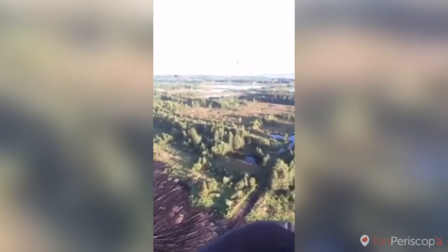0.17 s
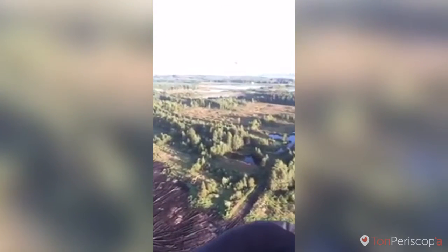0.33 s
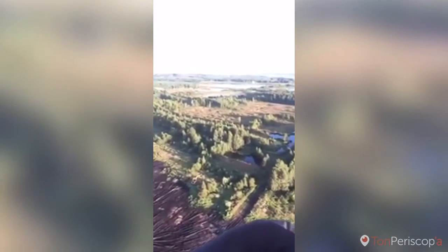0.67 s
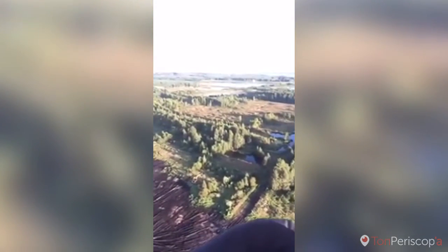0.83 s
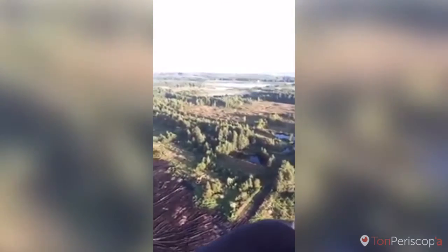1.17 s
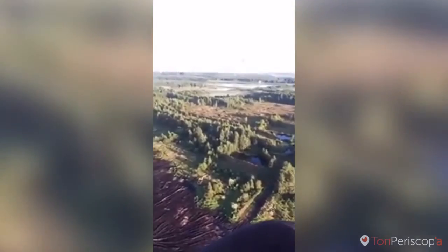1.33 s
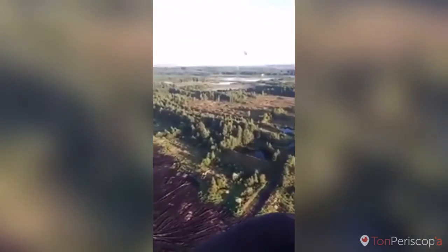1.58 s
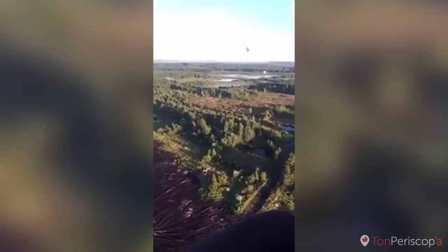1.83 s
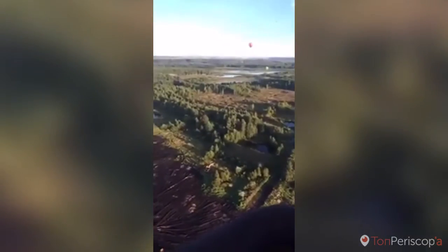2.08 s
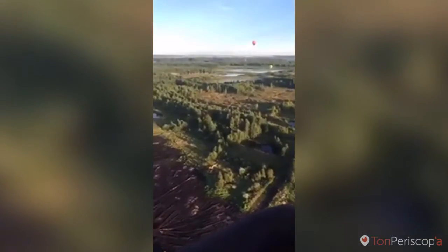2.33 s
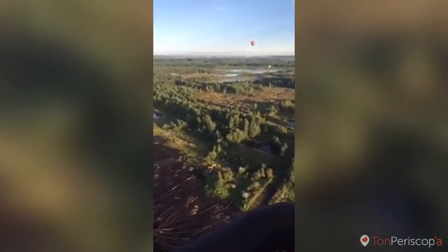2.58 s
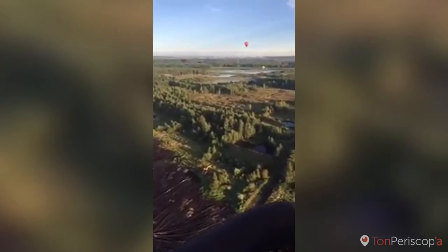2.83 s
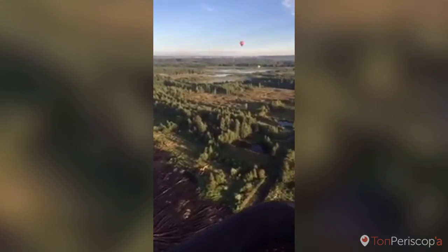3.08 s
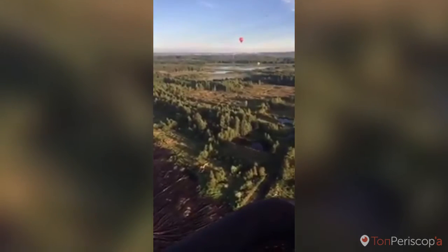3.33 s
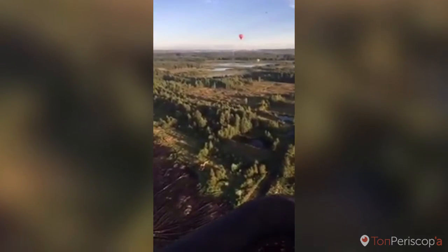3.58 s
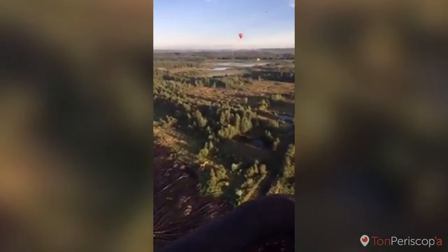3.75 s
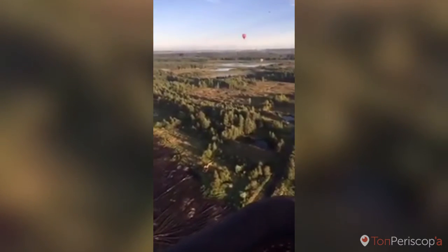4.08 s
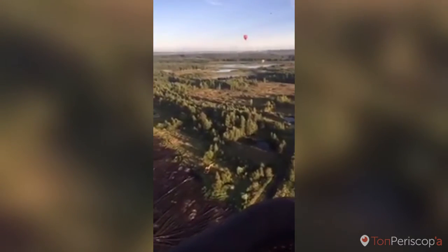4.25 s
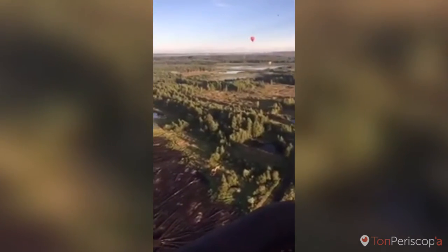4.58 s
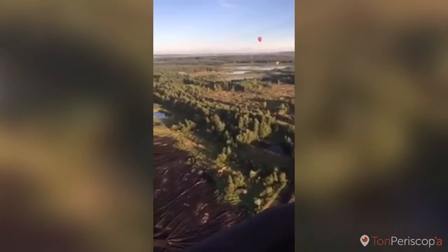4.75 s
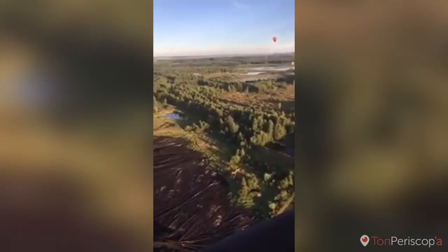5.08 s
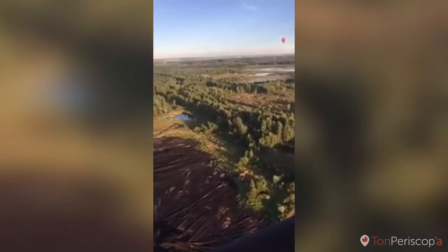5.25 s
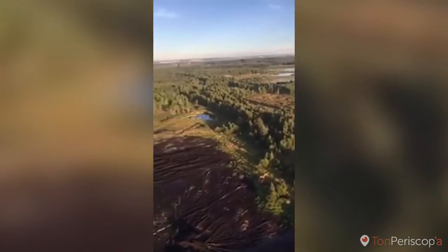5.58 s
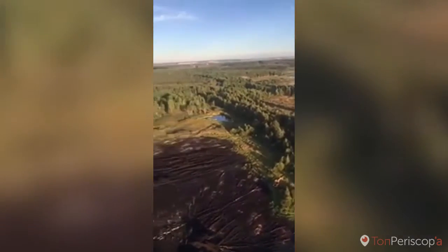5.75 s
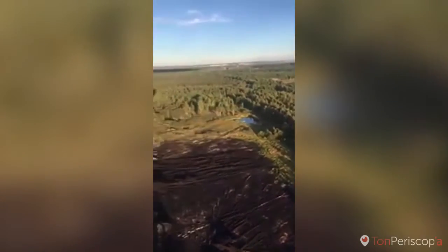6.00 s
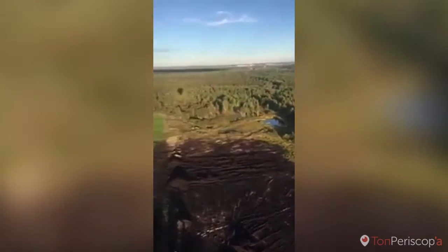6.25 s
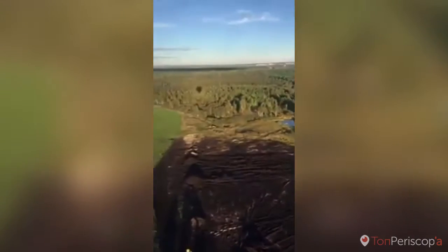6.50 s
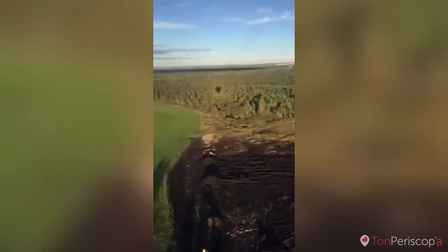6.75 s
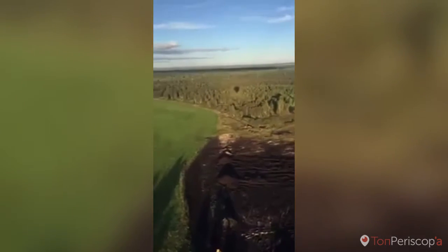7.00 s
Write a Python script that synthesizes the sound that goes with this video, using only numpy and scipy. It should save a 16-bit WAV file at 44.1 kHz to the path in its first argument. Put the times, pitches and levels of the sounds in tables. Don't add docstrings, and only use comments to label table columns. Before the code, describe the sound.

High in open air, a small pilot flame sputters and ticks quietly until a balloon burner bursts into a loud hissing roar, eases, and roars again.

```python
import sys
import numpy as np
from scipy import signal
from scipy.fft import rfft, irfft, next_fast_len
from scipy.io import wavfile
from scipy.ndimage import uniform_filter1d

SR = 44100
rng = np.random.default_rng(int(sys.argv[2]) if len(sys.argv) > 2 else 0)


def dump(signal):
    limited = np.clip(np.atleast_2d(signal).T, -1, 1)
    pcm = np.round(limited * 32767).astype(np.int16)
    wavfile.write(sys.argv[1], SR, pcm)


def boost_factor(decibels):
    exponent = np.asarray(decibels, float) / 20
    return 10 ** exponent


N = 314854


def rms_one(x):
    return x / np.sqrt(np.mean(x ** 2) + 1e-20)


def in_time(rows):
    s, *columns = np.transpose(rows)
    return [np.interp(np.arange(N) / SR, s, column) for column in columns]


def bump(s, width):
    return np.exp(-((np.arange(N) / SR - s) / width) ** 2)


def delayed(x, lag_s):
    return np.interp(np.arange(N) - lag_s * SR, np.arange(N), x)


def filtered(x, order, hz, kind="low"):
    return signal.sosfilt(signal.butter(order, hz, kind, fs=SR, output="sos"), x)


def stretch(coarse):
    return np.interp(np.arange(N) / 40, np.arange(len(coarse)), coarse)


def drift(rate):
    r = np.exp(-80 * np.pi * rate / SR)
    white = rng.standard_normal(N // 40 + 2002)
    return rms_one(signal.lfilter([1], [1, -2 * r, r * r], white)[2000:])


def turbulence(spectrum, patchy_db, rate):
    size = next_fast_len(N)
    hz = np.arange(size // 2 + 1) * SR / size + 1e-3
    points = np.array(spectrum)
    colour = boost_factor(np.interp(np.log(hz), np.log(points[:, 0]), points[:, 1], left=-120, right=-120))
    coloured = colour * rfft(rng.standard_normal(size))
    place = np.log2(hz / points[1, 0]) * 3 / 2
    count = int(np.log2(points[-2, 0] / points[1, 0]) * 3 / 2) + 1
    out, together = 0, drift(rate)
    for k in range(count + 1):
        share = np.clip(1 - abs(np.clip(place, 0, count) - k), 0, 1)
        swelling = stretch(boost_factor(patchy_db * (0.49 * together + drift(2 * rate))))
        out = out + swelling * irfft(share * coloured, size)[:N]
    return rms_one(out)


def resonance(x, hz, width):
    r = np.exp(-np.pi * width / SR)
    top = np.array([1, 0, -1]) * (1 - r * r) / 2
    return signal.lfilter(top, [1, -2 * r * np.cos(2 * np.pi * hz / SR), r * r], x)


def ring(clicks, hz, t60):
    r, w = boost_factor(-60 / (t60 * SR)), 2 * np.pi * hz / SR
    return signal.lfilter([0, np.sin(w)], [1, -2 * r * np.cos(w), r * r], clicks + 1e-18)


# (time [s], level [dB])
PILOT_SIZE = [(0.0, -51), (0.32, -49.5), (0.71, -56), (1.04, -53.5), (1.75, -58), (2.64, -53), (3.02, -52),
              (3.28, -55), (4.41, -56.5), (4.6, -55.5), (5.16, -56), (5.42, -54.5)]
# (frequency [Hz], density [dB per Hz])
FLUTTER_COLOUR = [(15, -60), (25, -23), (40, -37), (54, 2), (97, -3), (140, -7), (180, -52), (310, -120)]
RUMBLE_COLOUR = [(71, -30), (120, 0.5), (156, -3.5), (216, -3.5), (275, -11), (302, -17), (343, -14),
                 (410, -27.5), (550, -57), (720, -21.5), (1210, -120)]
PILOT_JET_COLOUR = [(240, -48), (400, -5), (1060, 2), (1380, -9), (1820, 1), (2020, -6.5), (2970, -8.5),
                    (3790, -11.5), (5730, -12.5), (6580, -15), (7660, -23.5), (9210, -22.5), (12500, -23),
                    (14800, -21), (15500, -38)]
# (frequency [Hz], width [Hz], level [dB])
WHISTLES = [(465.4, 9, -85), (932, 16, -80.5), (1770, 130, -74.5), (5700, 250, -91), (8970, 500, -81.5),
            (12400, 280, -81.5)]


def pilot():
    size_db, = in_time(PILOT_SIZE)
    flutter_db = -56.5 + 0.3 * (size_db + 61)
    flutter_db += 3.5 * bump(3.8, 1.4)
    flutter = boost_factor(flutter_db) * turbulence(FLUTTER_COLOUR, patchy_db=3.5, rate=5.0)
    rumble = boost_factor(size_db - 0.5) * turbulence(RUMBLE_COLOUR, patchy_db=1.5, rate=5.7)
    jet = boost_factor(-63.5) * turbulence(PILOT_JET_COLOUR, patchy_db=1.6, rate=5.3)
    white, waver = rng.standard_normal(N), [drift(2.35), drift(3.6)]
    for hz, width, db in WHISTLES:
        tone = rms_one(resonance(resonance(white, hz, width), hz, 2 * width))
        jet += stretch(boost_factor(db + 5.4 * waver[hz > 10000])) * tone
    turned_down = boost_factor(np.interp(np.arange(N) / SR, [5.52, 5.57], [0, -14]))
    return flutter + rumble * turned_down ** .4 + jet * turned_down


# (time [s], peak level [dB], frequency [Hz])
BASKET_KNOCKS = [(.149, -45, 300), (.933, -44, 330), (.307, -44, 450), (.328, -43, 480), (0.3312, -35, 637),
                 (.346, -41, 536), (.384, -32.5, 480), (.408, -35.5, 480), (0.517, -42, 1280),
                 (0.981, -41, 400), (0.999, -37.5, 590), (1.374, -38, 380), (1.382, -32.5, 320),
                 (1.3923, -21.5, 370)]
# (time [s], level [dB])
SLEEVE_SCUFF = [
    (0.28, -64),
    (0.318, -59),
    (0.334, -45),
    (0.358, -54),
    (0.375, -58),
    (0.39, -53),
    (0.424, -58),
    (0.48, -63),
]
# (frequency [Hz], width [Hz], level [dB])
WICKER_MODES = [(345, 66, -5), (672, 84, -4), (910, 84, -8), (1030, 42, -18), (480, 92, -18.5)]


def basket():
    crackle_db, crackle_t60_s = -22.5, .05
    knocks, crackle, t = np.zeros(N), np.zeros(N), np.arange(SR // 20) / SR
    for s, db, hz in BASKET_KNOCKS:
        here = slice(round(s * SR), round(s * SR) + len(t))
        crackle[here] += boost_factor(db + crackle_db - 60 * t / crackle_t60_s)
        turns = hz * (0.27 * t + 1.34 * 0.0041 * (1 - np.exp(-t / 0.0023)))
        envelope = t / 0.0035 * np.exp(1 - t / 0.0012) ** 0.56
        knocks[here] -= boost_factor(db) * envelope * np.sin(2 * np.pi * turns)
        low_push = np.exp(-t / 0.0081) * np.sin(2 * np.pi * 0.15 * hz * t)
        knocks[here] += boost_factor(db - 12) * low_push
    knocks = filtered(knocks, 2, 1600)
    grains = (rng.random(N) < 1600 / SR) * boost_factor(3.2 * rng.exponential(1, N)) * rng.choice([-1, 1], N)
    scuff = rms_one(sum(boost_factor(db) * resonance(resonance(grains, hz, 2 * width), hz, 3 * width)
                        for hz, width, db in WICKER_MODES))
    before, after = (SLEEVE_SCUFF[0][0] - .01, -110), (SLEEVE_SCUFF[-1][0] + .02, -110)
    scuff_db, = in_time(np.vstack([[before], SLEEVE_SCUFF, [after]]))
    creak = rms_one(resonance(resonance(rng.standard_normal(N), 367, 150), 367, 150))
    return knocks + boost_factor(-61.5) * bump(0.155, .12) * creak + (crackle + boost_factor(scuff_db)) * scuff


# (time [s], peak level [dB])
LEVER_CLANK = [
    (0.422, -9.5),
]
# (frequency [Hz], level [dB], T60 [s])
LEVER_MODES = [(1280, -27, .07), (2170, -15, .022), (2230, 14.5, 0.015), (1910, -14, 0.15),
               (2000, -23, 0.15), (2170, -14, 0.12), (2500, -13, .1), (3460, 17, 0.0082), (3700, 3, 0.023),
               (4630, 3.5, 0.097), (5000, -17, 0.08), (5440, -1.5, 0.077), (7100, -9, 0.054),
               (8800, 4, 0.032), (9860, -28, .06)]
# (frequency [Hz], width [Hz], level [dB])
BUZZ_MODES = [(1920, 70, 7), (2030, 90, 1), (2280, 110, -4), (2590, 200, -8), (4460, 320, -7),
              (5350, 280, -17)]


def lever():
    (s, db), = LEVER_CLANK
    clicks, out = np.zeros(SR // 3), np.zeros(N)
    clicks[[0, 23, 51, 90]] = boost_factor(db - 20.5) * np.array([-0.18, -0.26, 0.49, 0.11])
    rings = sum(boost_factor(mode_db) * ring(clicks, hz, t60) for hz, mode_db, t60 in LEVER_MODES)
    rings = filtered(rings, 4, 1220, "high")
    lag_s, rise_s, t60_s, buzz_db = 0.024, .003, 0.22, -41
    age = np.maximum(np.arange(len(clicks)) / SR - lag_s, 0)
    white = rng.standard_normal(len(clicks))
    buzz = rms_one(sum((-1) ** k * boost_factor(mode_db) * resonance(resonance(white, hz, width), hz, 3 * width)
                       for k, (hz, width, mode_db) in enumerate(BUZZ_MODES)))
    buzz *= boost_factor(buzz_db - 60 * age / t60_s) * (1 - np.exp(-age / rise_s))
    out[round(s * SR):][:len(clicks)] = rings + buzz
    return out


# (time [s], peak level [dB], T60 [s], treble
# tilt [dB])
LARGE_DROPS = [(0.4205, -35.5, 0.088, -5.5), (0.538, -48.5, 0.072, -1), (0.675, -47, 0.086, 4.5),
               (0.755, -49, .12, -3.5), (0.823, -49, 0.14, -7), (0.974, -48, 0.12, 0),
               (1.0, -49, 0.13, -2.5), (1.071, -50, 0.28, -2), (1.206, -47, 0.11, -0.5),
               (1.406, -46.5, 0.17, -4), (1.551, -47.5, 0.13, -1), (1.68, -48.5, 0.18, -1),
               (1.814, -49, .11, 3), (1.955, -42, 0.15, 0), (2.097, -50.5, 0.24, -1.5),
               (2.25, -49.5, 0.15, -2), (2.404, -49, 0.17, -2.5), (2.642, -47.5, 0.14, -11),
               (2.68, -47, 0.14, -2.5), (2.9, -49, 0.2, -3), (3.03, -47.5, 0.12, -2),
               (3.151, -49.5, 0.16, 0), (3.17, -48.5, 0.13, -6), (3.273, -48.5, 0.14, -1.5),
               (3.733, -45, .14, -3.5), (4.045, -46, 0.15, -3), (4.596, -49, 0.12, -3),
               (4.733, -49.5, 0.13, 1.5), (4.904, -49, 0.14, 0), (5.189, -50, .11, 1)]
# (time [s], peak level [dB], T60 [s], treble tilt [dB])
LITTLE_DROPS = [(0.009, -53, 0.15, -4), (0.106, -52.5, .078, 3), (0.176, -54.5, 0.17, -1.5),
                (0.219, -51.5, 0.15, 3), (0.267, -49, 0.1, 1.5), (0.306, -56, 0.45, -3),
                (0.513, -56, 0.1, -11.5), (0.93, -52.5, 0.11, -4), (1.286, -49.5, 0.11, 2.5),
                (1.491, -59, 0.086, -13.5), (1.944, -52, 0.15, -7), (2.484, -60, 0.09, -7),
                (2.516, -56.5, 0.14, 1), (2.787, -51.5, 0.11, -2), (2.85, -56.5, 0.14, -5),
                (3.381, -54.5, 0.2, -2), (3.472, -58, 0.16, -7), (3.49, -50.5, 0.11, 1),
                (3.597, -53, 0.13, 0), (3.856, -51.5, 0.1, 3), (4.138, -56, 0.085, -7),
                (4.292, -50.5, 0.12, -3), (4.403, -52, 0.23, -4), (4.489, -60, 0.14, 2),
                (5.041, -50.5, 0.087, -1), (5.106, -56, 0.092, -8), (5.322, -51.5, 0.22, -4.5),
                (5.439, -54.5, 0.14, -0.5)]
# (time [s], peak level [dB])
STEEL_TICKS = [(.091, -61), (.342, -63), (.617, -64.5), (1.338, -63), (1.662, -62), (1.746, -66),
               (2.21, -66), (2.313, -64), (2.388, -74), (2.551, -58.5), (2.75, -62), (2.961, -67),
               (3.01, -60), (3.577, -64), (3.676, -66), (3.798, -61), (3.976, -64), (4.098, -62),
               (4.201, -65), (4.656, -57.5), (4.836, -68), (4.968, -61.5), (5.135, -59.5), (5.247, -59.5)]


def spits():
    ticks = [(s, db, 0.12, -6.5) for s, db in STEEL_TICKS]
    return sorted(list(LARGE_DROPS) + list(LITTLE_DROPS) + ticks)


def spit_strength():
    power, t = np.full((3, N + SR), 1e-18), np.arange(SR // 5) / SR
    for s, level_db, t60, tilt_db in spits():
        swell = np.clip(0.074 * t60, .001, 0.02)
        rise = np.clip(t / min(swell, 0.0053), 0, 1) ** 0.22
        low_db = -6 - 0.21 * min(level_db + 43.5, 0) - 0.74 * tilt_db - 1.03 * s
        ranges = [(low_db, .006, 1.4), (-5 - tilt_db / 2, 0, 1), (-2 + tilt_db / 2, 0, .85)]
        for band, (db, lag, linger) in enumerate(ranges):
            fall_db = 60 * np.maximum(t - swell - lag, 0) / (max(t60, .03) * linger)
            shape = rise * boost_factor(level_db + db - fall_db)
            power[band, round(s * SR):][:len(t)] += shape ** 2
    return np.sqrt(power[:, :N])


def shell(x):
    t = np.arange(SR // 10) / SR
    tail = rng.standard_normal(len(t)) * boost_factor(-60 * t / 0.031)
    tail *= boost_factor(3) / np.sqrt(np.sum(tail ** 2))
    tail[0] = 1
    return signal.fftconvolve(x, tail / np.sqrt(np.sum(tail ** 2)))[:N]


# (frequency [Hz], width [Hz], level [dB])
COIL_MODES = [(1870, 104, 2.5), (2163, 16.4, 7), (2337, 5.9, 6), (2534, 15, 3.5), (2774, 26, 1.5),
              (3113, 170, 1.5), (3910, 290, -30), (4020, 37, 2), (4250, 12.5, 4.5), (4456, 74, 0.5),
              (4800, 14, 6), (5070, 22, 3.5), (5750, 390, 2), (5670, 25, -3), (6050, 34, -16),
              (6820, 8.7, -46), (8000, 42, -36), (8000, 21, -7), (8600, 120, -4.5), (9360, 440, -11.5),
              (10100, 64, -17), (11040, 160, -7), (11400, 53, -26), (12350, 170, -12)]
# (frequency [Hz], density [dB per Hz])
SPIT_COLOUR = [(760, -38), (1300, -12), (2160, -13.5), (3700, -13.5), (4370, -20), (6350, 12.5), (7570, -4),
               (9320, 3.5), (12700, -4.5), (14600, -2), (15500, -23)]


def coil():
    low_edge_hz, top_edge_hz = 4020, 7520
    strength, hiss = spit_strength(), turbulence(SPIT_COLOUR, patchy_db=3.5, rate=21.4)
    low = filtered(hiss, 4, low_edge_hz)
    middle = filtered(hiss, 4, [low_edge_hz, top_edge_hz], "band")
    top = filtered(hiss, 4, top_edge_hz, "high")
    fizz = sum(rms_one(band) * gain for band, gain in zip((low, middle, top), strength))
    drive = strength * rng.standard_normal(N)
    events = spits()
    latest = np.searchsorted(np.array(events)[:, 0] * SR, np.arange(N)) - 1
    spot = boost_factor(3 * rng.standard_normal((len(events), len(COIL_MODES))))
    rings = 0
    for k, (hz, width, db) in enumerate(COIL_MODES):
        band = int(hz > low_edge_hz) + int(hz > top_edge_hz)
        damped_hz = max(width, 34)
        mode = resonance(drive[band] * spot[latest, k], hz, damped_hz)
        rings = rings + (-1) ** k * boost_factor(db + 13.5) * mode
    return boost_factor(-2) * shell(fizz) + boost_factor(-6) * rings


# (time [s], peak level [dB], low note [Hz], high note [Hz])
STRUCK_SPOTS = [(0.6779, -40.5, 2940, 5530), (0.7572, -46, 2150, 6680), (0.8261, -44, 1920, 5490),
                (0.9328, -44, 2570, 5600), (0.9757, -45, 2170, 5460), (1.076, -39, 1970, 6700),
                (1.2087, -47, 1940, 5740), (1.2885, -41, 2940, 6450), (1.415, -37, 2340, 5670),
                (1.4931, -46, 3040, 5560), (1.5569, -40, 2090, 6970), (1.6836, -35, 1970, 6900),
                (1.75, -44, 1960, 5580), (1.8168, -40, 2170, 5800), (1.954, -35, 2360, 4800),
                (2.1057, -36.5, 1910, 6380), (2.2518, -39, 2110, 6150), (2.391, -43, 1790, 5560),
                (2.4858, -45, 1850, 5900), (2.5177, -45, 2136, 6320), (2.6484, -29, 2170, 4210),
                (2.684, -44, 2340, 4490), (2.7877, -40, 2350, 5850), (2.8535, -46, 3110, 5070),
                (2.9024, -38, 2360, 9570), (3.0361, -38, 2140, 6330), (3.1533, -44, 2140, 9350),
                (3.2755, -46, 1930, 5700), (3.3848, -44, 2140, 6300), (3.47, -42, 1816, 6800),
                (3.5998, -42, 2350, 6320), (3.735, -38.5, 1720, 6320), (3.8587, -40.5, 2320, 6300),
                (4.0518, -36.5, 3200, 4570), (4.3005, -43, 1770, 6550), (4.4093, -42, 1770, 4280),
                (4.5975, -43, 2120, 5310), (4.7367, -45, 2100, 4280), (4.9068, -45, 2180, 9600),
                (5.0445, -47, 2120, 5780), (5.1099, -51, 1720, 6500), (5.1917, -43, 2170, 6300),
                (5.328, -47, 1780, 5900), (5.4411, -46, 3000, 6070)]


def spot_notes():
    out, t = np.zeros(N + SR), np.arange(SR // 5) / SR
    chance = rng.random((len(STRUCK_SPOTS), 4))
    for (s, db, low_hz, high_hz), (a, b, c, d) in zip(STRUCK_SPOTS, chance):
        for hz, note_db, t60, apart, turn in ((low_hz, -16.5, 0.2, a, b), (high_hz, -10.5, 0.1, c, d)):
            second_hz, third_hz = hz * (1 + 0.067 * (apart - .5)), hz * (1 + 0.092 * (turn - .5))
            cluster = np.sin(2 * np.pi * hz * t)
            cluster += 0.41 * np.sin(2 * np.pi * (second_hz * t + turn))
            cluster += 0.52 * np.sin(2 * np.pi * (third_hz * t + apart))
            envelope = boost_factor(db + note_db - 60 * t / t60) * (1 - np.exp(-t / 0.0062))
            out[round(s * SR):][:len(t)] += envelope * cluster
    return out[:N]


# (start [s], end [s], frequency [Hz], width [Hz], level [dB])
THROAT_BANDS = [
    (6.06, 6.69, 2120, 600, -52),
    (5.54, 6.16, 732, 90, -28.5),
    (5.75, 6.55, 711, 110, -45),
    (6.785, 7.294, 1390, 250, -35.5),
    (5.515, 5.74, 1490, 500, -33),
    (5.525, 5.625, 5400, 2600, -32),
    (6.76, 6.85, 2270, 350, -36.5),
    (6.76, 6.8, 3900, 900, -50),
    (5.5, 5.6, 270, 90, -28),
    (6.6, 6.72, 1400, 900, -66),
]


def throat():
    t, white, out = np.arange(N) / SR, rng.standard_normal(N), 0
    for start, end, hz, width, db in THROAT_BANDS:
        envelope = np.sin(np.pi * np.clip((t - start) / (end - start), 0, 1)) ** 1.3
        out = out + boost_factor(db) * envelope * rms_one(resonance(resonance(white, hz, width), hz, width))
    return out


# (time [s], level [dB], frequency [Hz], growth [s], decay [s])
FIRST_PUFFS = (5.5112, -6, 158, .0045, .0035)


def kindling():
    s, db, hz, grow, die = FIRST_PUFFS
    t = np.arange(N) / SR - s
    envelope = np.where(t < 0, np.exp(np.minimum(t, 0) / grow), np.exp(-(t / die / 2) ** 4))
    return boost_factor(db) * envelope * np.cos(2 * np.pi * hz * t)


# (time [s], level [dB], start [Hz], end [Hz], pitch fall [s], length [s])
FIREBALL = (5.5192, .5, 255, 52, .0045, .032)


def ignition():
    s, db, start_hz, end_hz, fall, length = FIREBALL
    t = np.arange(N) / SR - s
    age = np.clip(t, -.0015, length)
    turns = end_hz * age + (start_hz - end_hz) * fall * (1 - np.exp(-age / fall))
    envelope = np.clip(1 + t / .0015, 0, 1) * np.clip((length - t) / .02, 0, 1)
    return filtered(-boost_factor(db) * envelope * np.cos(2 * np.pi * turns), 2, 2500)


# (time [s], level [dB])
FIRST_FLOW = [
    (5.484, -78.5),
    (5.514, -28),
    (5.559, -25.5),
    (5.734, -33),
    (6.04, -35),
    (6.25, -41),
    (6.494, -48.5),
    (6.6, -68),
    (6.66, -86),
]
SECOND_FLOW = [
    (6.752, -89.5),
    (6.772, -54),
    (6.79, -43.5),
    (6.817, -32),
    (6.864, -30.5),
    (7.061, -35.5),
    (7.14, -34.5),
]
# (time [s], width [s], level [dB])
FLAME_SURGES = [(5.55, 0.046, -7), (5.66, 0.055, 0.5), (5.9, 0.045, -2), (5.98, 0.014, 3),
                (6.235, 0.088, 3.5), (6.61, 0.067, 3.5), (6.81, 0.022, 0), (6.89, 0.051, 4.5),
                (7.09, 0.062, -1.5), (6.45, 0.039, -1), (5.51, 0.012, 5)]
# (time [s], width [s], level [dB])
CAN_SWELLS = [
    (5.525, .03, -1.5),
    (5.6, 0.034, 1),
    (6.9, 0.039, -1),
]
# (time [s], width [s], level [dB])
LEAKS = [
    (6.62, .045, -62),
    (6.628, .006, -62),
    (6.71, .015, -70),
]
# (frequency [Hz], density [dB per Hz])
ROAR_COLOUR = [(15, -50), (27, -14), (59, -2.5), (151, 1.5), (204, -4), (253, -2), (305, -8.5), (357, -6.5),
               (419, -13.5), (600, -21), (780, -51), (1320, -120)]
CAN_COLOUR = [(240, -43), (400, -0.5), (421, -19.5), (497, -1), (542, -10.5), (602, -8.5), (723, -0.5),
              (875, -10.5), (989, -6.5), (1140, -8.5), (1310, -18), (1610, -15.5), (2160, -13.5),
              (2690, -20), (3200, -52), (4160, -35), (7040, -120)]
JET_COLOUR = [(1470, -35), (2500, -0.5), (2700, -10.5), (2860, 0.5), (3160, -2.5), (3680, -7.5),
              (4290, -5.5), (4850, -6.5), (6600, -9.5), (8580, -19), (14500, -120)]
NOZZLE_COLOUR = [(3760, -5.5), (6400, 0), (7000, -2), (7700, -2), (9440, 3), (10500, -1), (14100, 1),
                 (15000, -1.5)]


def blast():
    shut = (FIRST_FLOW[0][0] - .012, -160)
    flow_db, = in_time(np.vstack([[shut], FIRST_FLOW, SECOND_FLOW]))
    lit_db = np.minimum(flow_db, delayed(flow_db, 0.011))
    roar_db = -18 + 0.63 * (lit_db + 34)
    can_db = -25.5 + 0.71 * (flow_db + 34)
    jet_db = -35.5 + 0.79 * (flow_db + 34)
    held_db = sum(db * bump(s, width) for s, width, db in FLAME_SURGES)
    warm_db = sum(db * bump(s, width) for s, width, db in CAN_SWELLS)
    roar = boost_factor(roar_db + held_db + 3.5) * turbulence(ROAR_COLOUR, patchy_db=2.0, rate=13.0)
    can = boost_factor(can_db + 0.4 * held_db + warm_db) * turbulence(CAN_COLOUR, patchy_db=1.3, rate=3.2)
    jet = boost_factor(jet_db) * turbulence(JET_COLOUR, patchy_db=2.0, rate=4.7)
    hiss = turbulence(NOZZLE_COLOUR, patchy_db=-0.06, rate=9.2)
    low, top = filtered(hiss, 3, 7440), filtered(hiss, 3, 7440, "high")
    top_db = 0.5 + np.minimum(flow_db, delayed(flow_db, 0.0094))
    top_db += 0.26 * np.minimum(flow_db + 40.5, 0)
    top_db = np.where(np.arange(N) < 5.54 * SR, 0.5 + flow_db, top_db)
    wisps = sum(boost_factor(db) * bump(s, width) for s, width, db in LEAKS)
    weak = 0.55 * np.clip((-45 - flow_db) / 4, 0, 1)
    weak *= np.clip((flow_db + 66) / 4 + 3, 0, 1)
    can -= weak * resonance(can, 1430, 350)
    return roar + can + jet + boost_factor(flow_db) * low + boost_factor(top_db) * top + wisps * (low + 0.26 * top)


def scene():
    return (pilot() + coil() + lever() + basket() + blast() + throat() + ignition() + kindling() + spot_notes())[None]


CUTOFF_HZ = 15120
# (start [s], end [s], upper edge [Hz])
TOP_SPANS = [(5.5, 5.538, 15820), (5.782, 5.817, 15820), (5.945, 6.003, 15820), (6.04, 6.073, 15820),
             (6.107, 6.142, 15470), (6.178, 6.2, 15600), (6.2, 6.235, 15820), (6.25, 6.283, 15820),
             (6.318, 6.352, 15720), (6.388, 6.443, 15800), (6.528, 6.556, 15750), (6.775, 6.84, 15750),
             (6.897, 6.932, 15820), (6.988, 7.05, 15820), (7.063, 7.096, 15820)]


def top_band(x):
    t, out = np.arange(N) / SR, 0
    below = filtered(x, 4, [14200, 14900], "band")
    envelope = np.sqrt(uniform_filter1d(below ** 2, size=900) * SR / 1400 + 1e-18)
    white = rng.standard_normal(N) * envelope
    bands = {hz: filtered(white, 8, [CUTOFF_HZ, hz - 50], "band") for *_, hz in TOP_SPANS}
    for start, end, hz in TOP_SPANS:
        out = out + np.clip(np.minimum(t - start, end - t) / .006 + .5, 0, 1) * bands[hz]
    return boost_factor(-14) * out


def low_pass(x):
    return signal.sosfilt(signal.butter(12, 15820, fs=SR, output="sos"), x)


def record(dry):
    overload = .76
    thin = filtered(dry, 2, 40, "high")
    flat = thin / np.sqrt(np.sqrt(1 + (thin / overload) ** 4))
    cut = signal.sosfilt(signal.cheby2(14, 24, CUTOFF_HZ, fs=SR, output="sos"), flat)
    return low_pass(cut + top_band(cut[0]))


dry = scene()
out = record(dry)
dump(out)
```